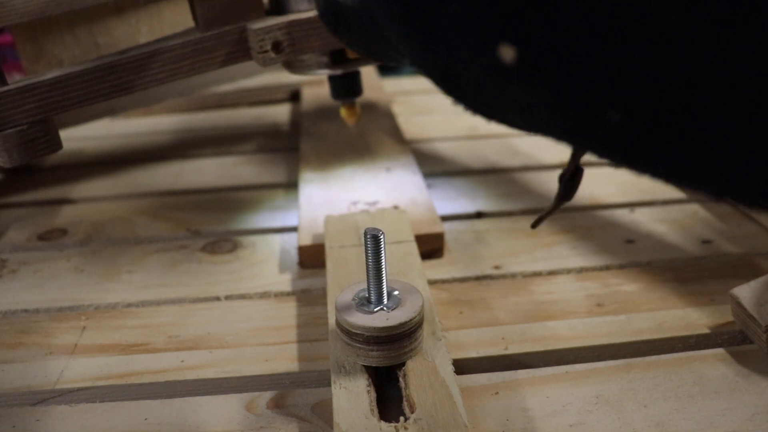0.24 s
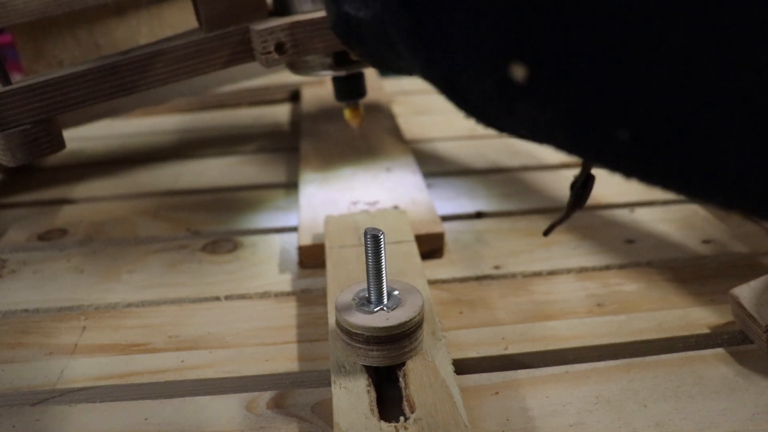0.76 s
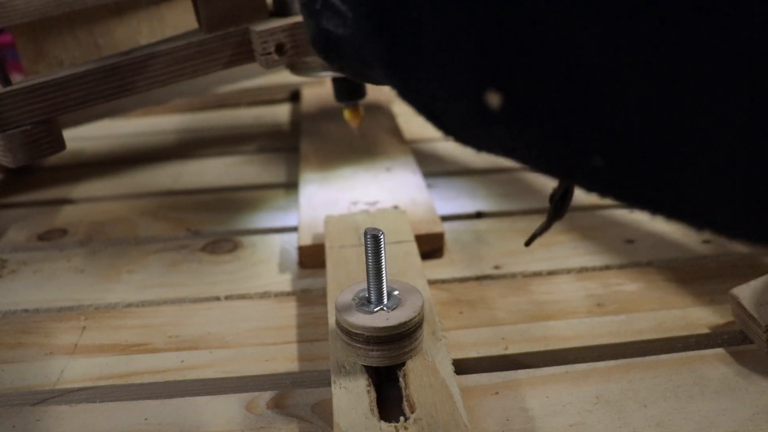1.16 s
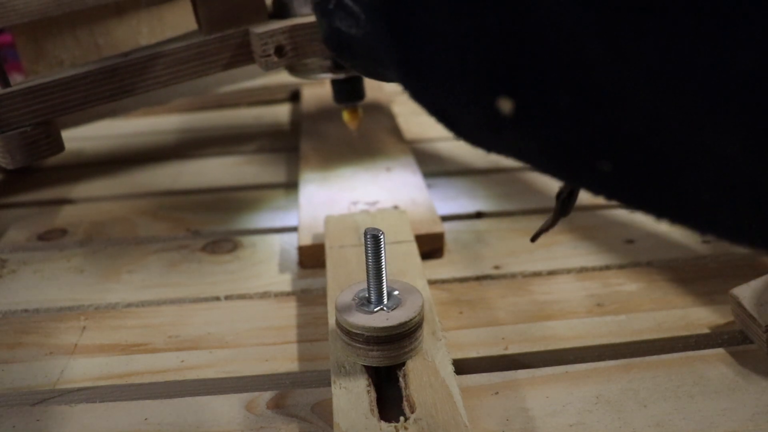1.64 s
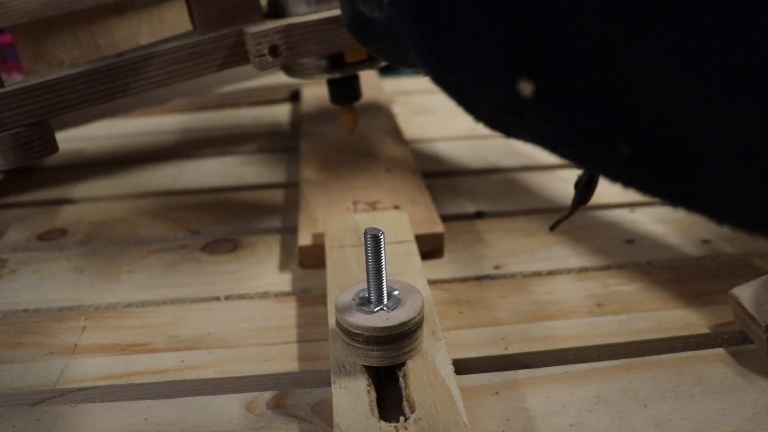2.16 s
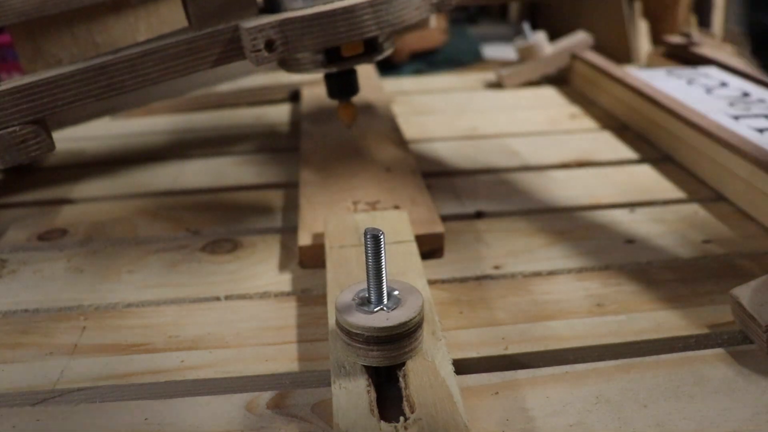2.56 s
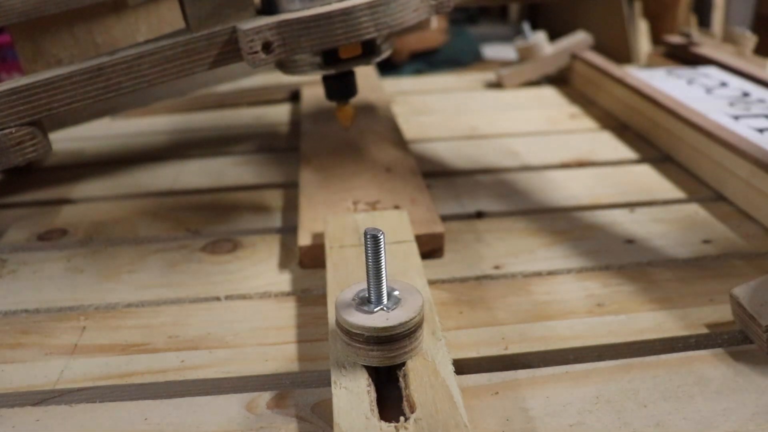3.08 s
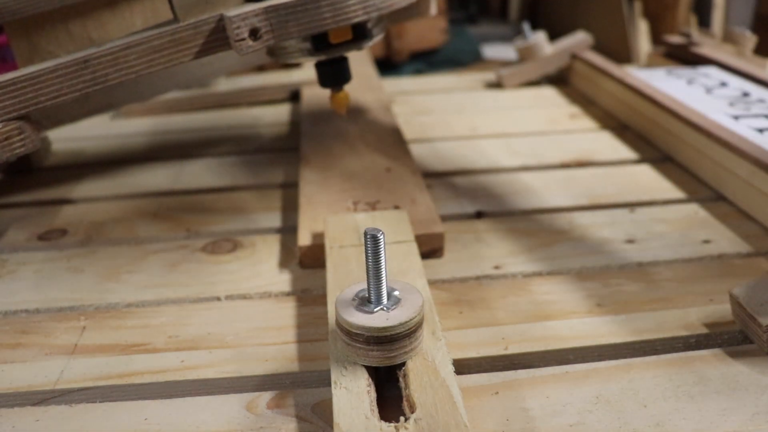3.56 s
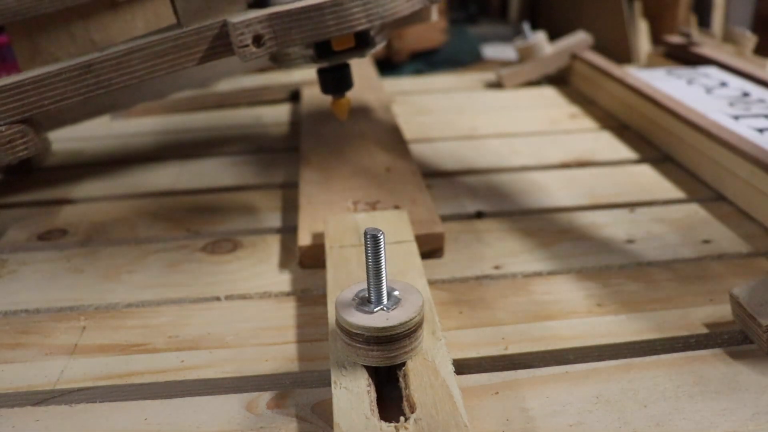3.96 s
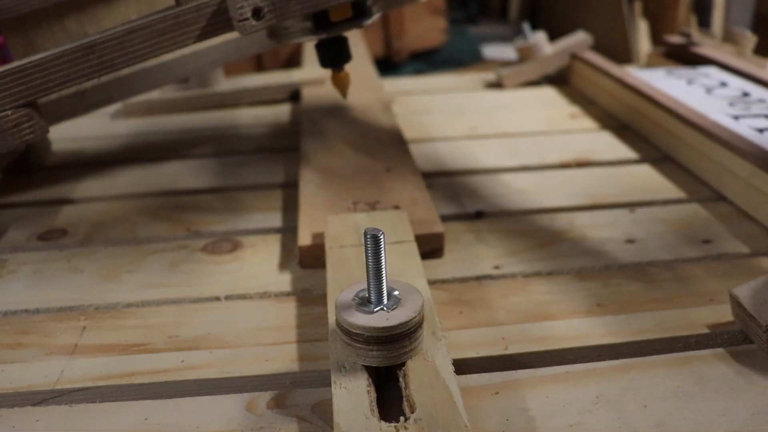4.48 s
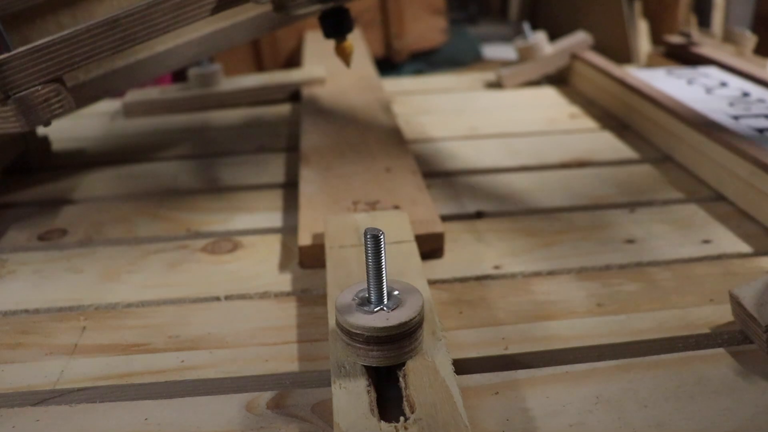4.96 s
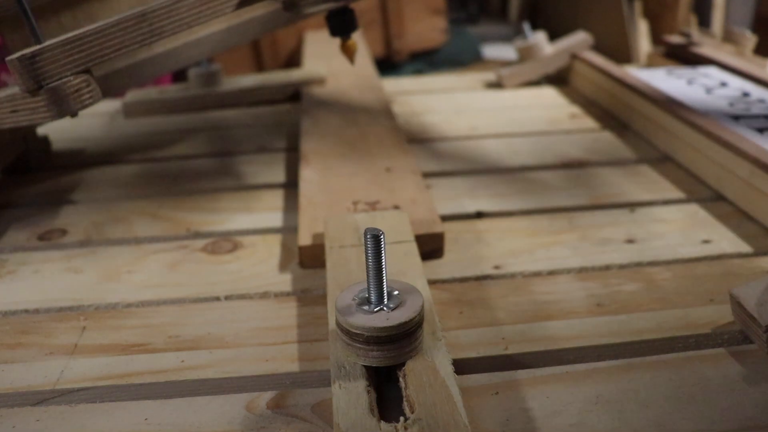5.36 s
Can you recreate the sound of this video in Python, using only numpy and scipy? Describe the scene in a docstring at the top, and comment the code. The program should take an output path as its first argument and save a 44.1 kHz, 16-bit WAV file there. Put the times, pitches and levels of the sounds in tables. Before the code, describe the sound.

Close stereo pickup of a handheld wood router in a small, dry workshop. It runs at steady full speed for about two seconds, a dense bright whine over rushing fan air. Switched off, its pitch slides continuously downward for over three seconds, individual tones swelling and flickering as they fall. The air rush fades late while bearing hiss and metallic singing become clearer; the wooden arm knocks softly once near 4.4 seconds.

```python
"""Wood router coasting down

A wood router runs at full speed in a small workshop, is switched off after two seconds and coasts down.
Its shaft hums, its cooling fan rushes and whines, and its ball bearings hiss and sing, heard ever louder
as it slows. The tones are sine waves locked to one shaft speed; the air and the hiss are coloured noise.
As the tones fall they swell in the resonances of the housing; the wooden arm that carries it knocks once."""
import sys
import numpy as np
from scipy import signal
from scipy.fft import rfft, irfft, next_fast_len
from scipy.io import wavfile
from scipy.ndimage import map_coordinates

SR = 44100
rng = np.random.default_rng(int(sys.argv[2]) if len(sys.argv) > 2 else 0)


def dump(signal):
    """Clip the signal to [-1, 1] and save it as 16-bit WAV at the path in sys.argv[1]."""
    limited = np.clip(np.atleast_2d(signal).T, -1, 1)
    pcm = np.round(limited * 32767).astype(np.int16)
    wavfile.write(sys.argv[1], SR, pcm)


N = 247842

# Peaks and dips of the router's housing: (frequency [Hz], width [Hz], gain [dB])
HOUSING_PEAKS = [(382, 160, -10.5), (518, 52, 10.5), (660, 90, 4), (792, 21, 5.5), (1030, 25, 2),
                 (1165, 64, -1), (1295, 47, 1.5), (1444, 64, 5.5), (1648, 94, 9), (2044, 198, 11.5),
                 (2650, 89, -5), (2950, 270, 6), (4320, 720, 10.5), (6640, 1650, 5)]
# Resonances and nulls of the arm and bench under the shaft: (frequency [Hz], width [Hz], gain [dB])
MOUNT_PEAKS = [(107, 7.2, -19), (166, 3.9, 10), (187.5, 8.4, 9), (209, 7, -4), (244.6, 22.4, 15),
               (290, 36.5, 10.5), (296.5, 2.7, -17), (334.4, 11, 8.5), (369, 6, 7), (391.6, 9.4, 14.5),
               (409, 5.1, 11), (417, 2.8, -4), (427, 12, 9), (451.4, 23, 17)]
# Fan blades and commutator bars: (pitch [cycles a turn], first level [dB], level at switch-off [dB],
# level at the end [dB], outlet pipe modes: list of (frequency [Hz], width [Hz], gain [dB]))
FAN_TONES = [(12, -47.5, -36.5, -43.5, [(2870, 180, 12), (3920, 240, 9), (4460, 440, 13), (5480, 420, 7)]),
             (13, -39.5, -38, -47, [(2938, 86, 16.5), (3130, 90, 13.5), (3560, 470, 11.5), (4170, 220, 9.5),
             (5250, 140, 11), (5750, 250, 6)]), (24, -38, -45.5, -41, [(2900, 280, 14), (4260, 310, 11.5),
             (4835, 380, 15.5), (5250, 120, -12), (6100, 960, 10.5)])]
# Armature tones: (pitch [cycles a turn], level under power [dB], level coasting [dB])
MOTOR_TONES = [(2, -39, -32.5), (3, -36, -35), (4, -46, -42.5), (7, -44, -60), (10, -51, -41),
               (14, -59, -44), (15, -52, -45.5), (17, -61.5, -54), (19, -63, -49), (21, -65, -43),
               (22, -44, -46), (27, -60.5, -42), (31, -64, -41)]
# Colour of the air rushing through the vents: (frequency [Hz], relative level [dB])
RUSH_COLOUR = [(30, -48), (120, -36.5), (270, -23.5), (350, -10), (490, -9), (565, -15), (625, -1),
               (790, -1), (1250, -2.5), (2300, -9.5), (4400, -7.5), (8000, -8.5), (11000, -13),
               (15500, -22.5)]
# Resonances of the air outlet: (frequency [Hz], relative level [dB])
VENT_COLOUR = [(2400, -4.5), (2850, -5.5), (3130, 5), (3650, -2), (4400, 3), (5600, -0.5)]
# Colour of the vortices off the blades: (pitch [cycles a turn], relative level [dB])
VORTEX_COLOUR = [(.8, -76), (2, -35), (5.5, -15), (7, -7.5), (9.3, 0), (10.6, -1), (12.5, -5.5), (14, -41),
                 (17.5, -5.5), (20, -19), (25, -13), (36, -25.5)]
# Colour of the rolling bearings: (frequency [Hz], relative level [dB])
HISS_COLOUR = [(40, -35.5), (350, -13.5), (550, -21), (700, -11), (2100, -8), (2600, -3.5), (3600, -8.5),
               (4300, 0.5), (5800, -3.5), (7300, -1), (8200, 1.5), (9200, -5.5), (12000, -10.5),
               (15500, -19.5)]
# Bearing tones, shaft pitch rounded to whole cycles when used: (pitch [ball-pass multiples],
# added pitch [cycles a turn], level at full speed [dB], level when slow [dB])
BEARING_TONES = [(1, 0, -42.5, -27.5), (1, 1.5, -52, -58), (1, 2.5, -41.5, -49.5), (-1, 10, -53, -46.5),
                 (2, 0.5, -56, -38), (2, 1, -52, -38.5), (3, 0.5, -55, -30.5), (4, 0.5, -76, -34.5),
                 (6, -0.5, -63, -43)]
# Bumps that make up the knock: (time [s], relative level [dB])
KNOCK_BUMPS = [(4.35, -15.5), (4.37, -27), (4.394, -23)]
# Ringing of the wooden arm: (frequency [Hz], relative level [dB], time to fall 60 dB [s])
ARM_MODES = [(90, -12, 0.13), (170, -4.5, 0.15), (323, 16, 0.042), (430, 6, 0.065), (576, 12, .05)]
# How alike the noise is at both ears: (frequency [Hz], likeness [0 to 1])
EAR_LIKENESS = [(60, 0.95), (130, 1), (290, 0.96), (640, 0.97), (1410, 0.68), (3100, 0.2), (6820, 0.5),
                (15000, 0.13)]
# How the sound leans to one side: (frequency [Hz], left minus right [dB])
LEFT_LEAN = [(100, -.5), (440, -2.5), (650, 0), (2500, -2), (4500, 0.5), (8000, -1.7), (13000, 2)]
# A sleeve shades the right side, then draws back: (time [s], left minus right [dB])
SLEEVE_SHADE = [(0, 3.5), (2.2, 2.5), (2.7, 1), (3.3, 1)]
# Fading of the workshop's echo: (frequency [Hz], time to fall 60 dB [s])
SHOP_DECAY = [(200, 0.23), (2000, 0.17), (12000, 0.088)]

TOP_HZ = 15750  # nothing is heard above this
# Shaft speed in turns a second, its sag under power, and the time of the switch-off
FULL_HZ, SAG_HZ, OFF_S = 453.3, 2.8, 2.103
# Coasting: steady friction, the speed that air drag takes early on, and how quickly it does so
FRICTION_HZ_PER_S, DRAG_HZ, DRAG_S = 91.2, 18.1, .353
BIND_HZ, BIND_S = 2.1, .33  # the bearings bind: speed lost by the end, and how fast that loss grows
RELEASE_S = 0.6  # the motor's magnetic pull lets go over this time
HUM_DB = -41.5  # before the mount's resonances
MOTOR_FADE_DB, FADE_ORDER = -26.5, 5.4  # fade when slow, strongest in the orders below this one
MOTOR_SLOW_DB = -4  # all armature tones weaken by this near the end
JITTER_TURNS = .0016  # typical shake of the armature's phase
RUSH_DB, VORTEX_DB = -23.5, -23.5  # heard level of the air at higher speeds
# Below this shaft speed the air is heard to fade, this steeply
AIR_KNEE_HZ, RUSH_DB_PER_OCTAVE, VORTEX_DB_PER_OCTAVE = 231, 14, 27
# Heard level of the hiss under power, added after the switch-off, added when slow; and the first rise's time
HISS_DB, HISS_FREE_DB, HISS_SLOW_DB, HISS_RISE_S = -29.5, 4.5, 5, 0.63
BALL_ORDER, BALL_SLIP = 3.662, .016  # ball passes a turn, and how many fewer when slow
BEARING_GROWTH = 0.47  # power of the lost speed by which the bearing tones change level


def amp(db):
    """Turns decibels into a gain."""
    return 10 ** (np.asarray(db) / 20)


def unit(x):
    """Scales a sound to an average strength (rms) of 1."""
    return x / np.sqrt(np.mean(x ** 2) + 1e-20)


def along(points, hz):
    """Joins (frequency, value) points on a log frequency axis."""
    f, value = np.transpose(points)
    return np.interp(np.log(hz + 1e-6), np.log(f), value)


def curves(rows):
    """Gives one value per sample for each column after the time."""
    times, *columns = np.transpose(rows)
    return [np.interp(np.arange(N) / SR, times, column) for column in columns]


def peaks(table, hz):
    """Gain in dB of a body whose resonances are bell-shaped peaks and dips over frequency."""
    grid = np.arange(0, SR // 2, 2)
    gain_db = sum(db * np.exp(-((grid - centre) / width) ** 2) for centre, width, db in table)
    return np.interp(hz, grid, gain_db)


def wobble(rate):
    """A smooth random curve with this many random points a second."""
    knots = rng.standard_normal(int(N * rate / SR) + 4)
    coarse = np.arange(0, N, 64)  # worked out at every 64th sample only
    return np.interp(np.arange(N), coarse, map_coordinates(knots, [coarse * rate / SR]))


def filtered(x, response):
    """Multiplies the spectrum of x by a response that depends on frequency."""
    m = next_fast_len(N + SR // 2)
    spectrum = rfft(x, m) * response(np.fft.rfftfreq(m, 1 / SR))
    return irfft(spectrum, m)[..., :N]


def noise(colour):
    """Stereo noise of rms 1 with a colour in dB, most alike at both ears in the bass."""
    def mid_side_gain(hz):
        angle = np.arccos(np.clip(along(EAR_LIKENESS, hz), 0, 1)) / 2
        return amp(colour(hz)) * [np.cos(angle), np.sin(angle)]
    mid, side = filtered(rng.standard_normal((2, N)), mid_side_gain)
    return unit(np.array([mid + side, mid - side]))


def tone(turns, order):
    """A sine of rms 1 that makes 'order' cycles in each shaft turn."""
    return np.sqrt(2) * np.sin(2 * np.pi * (order * turns + rng.random()))


def shaft():
    """Turns a second: nearly steady under power, then braked by friction and at first by the fan's drag."""
    t = np.arange(N) / SR
    coast = np.maximum(t - OFF_S, 0)
    powered = FULL_HZ - SAG_HZ * np.minimum(t / OFF_S, 1) ** 2
    drag = DRAG_HZ * (1 - np.exp(-coast / DRAG_S))
    bind = BIND_HZ * np.exp((t - t[-1]) / BIND_S)
    return powered - FRICTION_HZ_PER_S * coast - drag - bind


def since_off(rise_s):
    """0 under power, rising to 1 after the switch-off."""
    return np.clip((np.arange(N) / SR - OFF_S) / rise_s, 0, 1)


def slowness(speed):
    """0 at full speed, 1 at the slowest."""
    start_hz = FULL_HZ - SAG_HZ
    return np.clip((start_hz - speed) / (start_hz - speed.min()), 0, 1)


def hum(speed, turns, spread_s=0.0002):
    """The unbalanced shaft shakes the mount, swells at its resonances and reaches the ears slightly apart."""
    lead = np.array([[1], [-1]]) * spread_s * speed / 2
    return amp(HUM_DB + peaks(MOUNT_PEAKS, speed)) * tone(turns + lead, order=1)


def siren(speed, turns):
    """Fan blades and commutator bars chop the air and sweep the outlet's modes; turbulence shakes them."""
    out = np.zeros(N)
    for order, first_db, off_db, end_db, modes in FAN_TONES:
        level_db = curves([(0, first_db), (OFF_S, off_db), (N / SR, end_db)])[0]
        level_db = level_db + peaks(modes, round(order) * speed)
        gain = amp(level_db + 1.42 * wobble(28))
        out += gain * tone(turns + 0.0014 * wobble(60), round(order))
    return out


def whine(speed, turns):
    """Armature tones swell as each passes a housing resonance; the low ones fade most with the speed."""
    coasting, slow = since_off(RELEASE_S), slowness(speed)
    out = np.zeros(N)
    for order, power_db, coast_db in MOTOR_TONES:
        level_db = power_db + coasting * (coast_db - power_db)
        fade_db = MOTOR_FADE_DB * slow / (1 + (order / FADE_ORDER) ** 2) + MOTOR_SLOW_DB * slow ** 3
        db = level_db + fade_db + peaks(HOUSING_PEAKS, round(order) * speed)
        gain = amp(db + 1.0 * wobble(22))
        out += gain * tone(turns + JITTER_TURNS * wobble(50), round(order))
    return out


def buzz(speed, turns, stop_order=52):
    """Brushes and worn bearings make a faint comb of high tones, heard louder as the shaft slows."""
    comb = np.zeros(N)
    for whole in range(16, stop_order):
        for order in (whole, whole + BALL_ORDER):  # each with a partner one ball-pass pitch higher
            hz = order * speed
            treble_cut = (hz < TOP_HZ) / (1 + (hz / 8000) ** 2)
            comb += amp(6.7 * wobble(4)) * tone(turns, order) * treble_cut
    return amp(-62.5 - 10 * np.log2(speed / speed.mean()).clip(-1, 1)) * comb


def fan(speed):
    """Air rushes through the vents; blade vortices fall in pitch with the speed; both are heard to fade."""
    octaves_down = np.log2(np.maximum(AIR_KNEE_HZ / speed, 1))
    rush_db = RUSH_DB - RUSH_DB_PER_OCTAVE * octaves_down
    vortex_db = VORTEX_DB - VORTEX_DB_PER_OCTAVE * octaves_down
    rush = noise(lambda hz: along(RUSH_COLOUR, hz) + 0.31 * peaks(HOUSING_PEAKS, hz))
    # the vortex colour slides along with the shaft, one short slice of noise after another
    hz, t, slices = signal.stft(noise(lambda hz: along(VENT_COLOUR, hz)), SR, nperseg=1024)
    slice_speed = np.interp(t, np.arange(N) / SR, speed)
    gain = amp(along(VORTEX_COLOUR, hz[:, None] / slice_speed))
    shaped = slices * gain / np.linalg.norm(gain, axis=0)
    vortex = unit(signal.istft(shaped, SR, nperseg=1024)[1][:, :N])
    return amp(rush_db + 0.55 * wobble(14)) * rush + amp(vortex_db + 0.63 * wobble(11)) * vortex


def bearing_hiss(speed, turns):
    """Rolling noise rings fixed metal resonances, pulses a little each turn; heard louder during the coast."""
    hiss = noise(lambda hz: along(HISS_COLOUR, hz))
    db = HISS_DB + HISS_FREE_DB * since_off(HISS_RISE_S) + HISS_SLOW_DB * slowness(speed) ** 2
    pulsing = unit(hiss * (1 + 0.083 * tone(turns, order=1)))
    return amp(db + 0.61 * wobble(11)) * pulsing


def bearing_song(speed):
    """Balls roll over the races, slipping a little, and ring the housing; most tones are heard ever louder."""
    slow = slowness(speed)
    pass_hz = speed * (BALL_ORDER - BALL_SLIP * slow)
    slip = 0.019 * wobble(35)  # in ball-pass cycles
    out = np.zeros(N)
    for multiple, sideband, fast_db, slow_db in BEARING_TONES:
        hz = round(multiple) * pass_hz + round(sideband) * speed
        level_db = fast_db + (slow_db - fast_db) * slow ** BEARING_GROWTH
        gain = amp(level_db + peaks(HOUSING_PEAKS, hz) + 1.28 * wobble(20))
        out += gain * tone(np.cumsum(hz) / SR + multiple * slip, order=1)
    return out


def bench(x, depth, count=10):
    """Dull, weak copies off the bench top cut a fixed comb that the falling tones flicker through."""
    delays_s = rng.uniform(.001, .014, count)
    copies = np.zeros_like(x)
    for k, delay_s in enumerate(delays_s):
        copies += (-1) ** k * np.pad(x, [(0, 0), (round(delay_s * SR), 0)])[:, :N]
    dull = filtered(copies, lambda hz: 1 / np.hypot(1, hz / 4000))
    return x + depth * dull / np.sqrt(count)


def workshop(x):
    """The short answer of bench and walls: fading noise, different at each ear."""
    hz, t, slices = signal.stft(rng.standard_normal((2, SR // 3)), SR, nperseg=256)
    fade = amp(-60 * t / along(SHOP_DECAY, hz)[:, None])
    tail = signal.istft(slices * fade, SR, nperseg=256)[1]
    return signal.fftconvolve(x[None], tail / np.linalg.norm(tail[0]), axes=1)[:, :N]


def knock():
    """The wooden arm bumps and settles: a few close bumps, each ringing the arm's own pitches."""
    out, t = np.zeros(N), np.arange(SR // 4) / SR
    soft_start = 1 - np.exp(-t / 0.0021)
    for start_s, bump_db in KNOCK_BUMPS:
        ring = np.zeros(len(t))
        for hz, level_db, t60 in ARM_MODES:
            fade = amp(level_db + rng.normal(0, 2.7) - 60 * t / t60)
            ring += fade * np.sin(2 * np.pi * hz * t)
        out[round(start_s * SR):][:len(t)] += amp(bump_db - 12) * ring * soft_start
    return out


def scene():
    """One shaft speed drives every layer but the knock."""
    speed = shaft() * (1 + 0.00031 * wobble(8))
    turns = np.cumsum(speed) / SR
    low = hum(speed, turns) + knock()
    tones = bearing_song(speed) + siren(speed, turns)
    overtones = bench((whine(speed, turns) + buzz(speed, turns))[None], depth=0.49)[0]
    air = bench(fan(speed) + bearing_hiss(speed, turns), depth=0.38)
    air = air * amp(-.5 + 0.45 * wobble(18))
    room = workshop(amp(-8) * (tones + overtones))
    shade = amp(np.array([[1], [-1]]) * curves(SLEEVE_SHADE)[0] / 2)
    return low + shade * (tones + overtones + air + room)


def record(dry):
    """Two close microphones: the left hears sound 22 microseconds earlier, and the top treble is cut off."""
    ears = np.array([[1], [-1]])

    def response(hz):
        lean = amp(ears * along(LEFT_LEAN, hz) / 2)
        lead = np.exp(1j * np.pi * ears * hz * .000022)
        return lean * lead * (hz < TOP_HZ)
    return filtered(dry, response)


dry = scene()
out = record(dry)
dump(out)
```